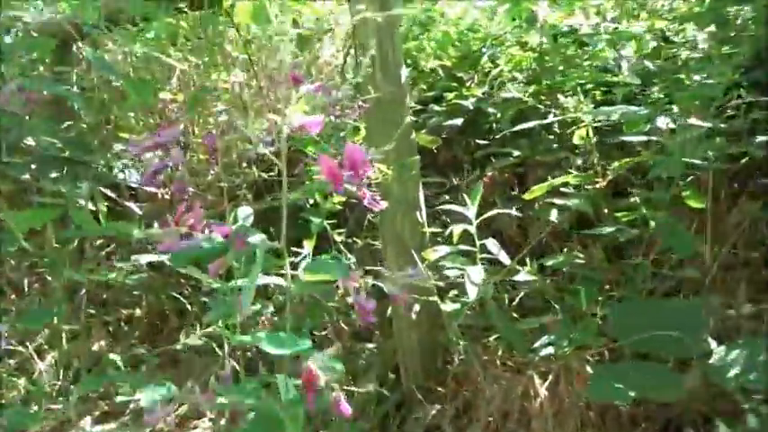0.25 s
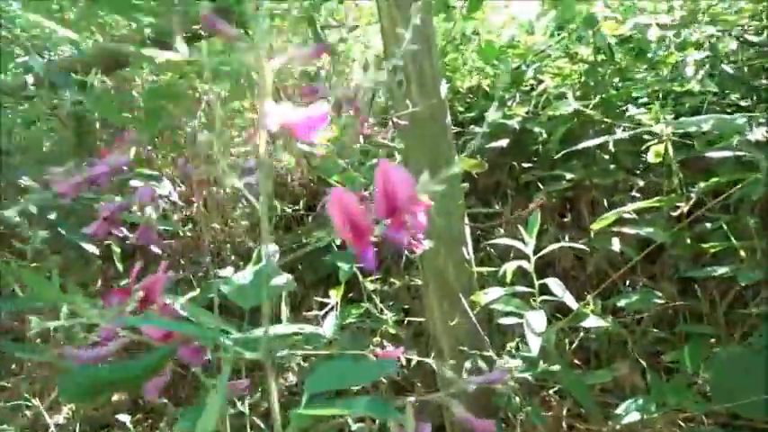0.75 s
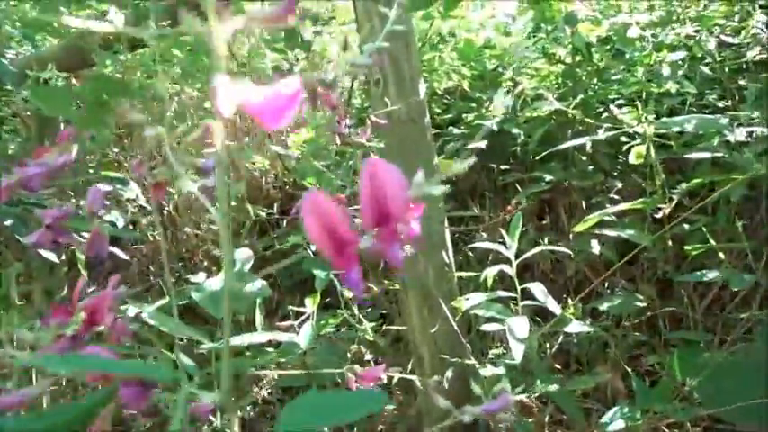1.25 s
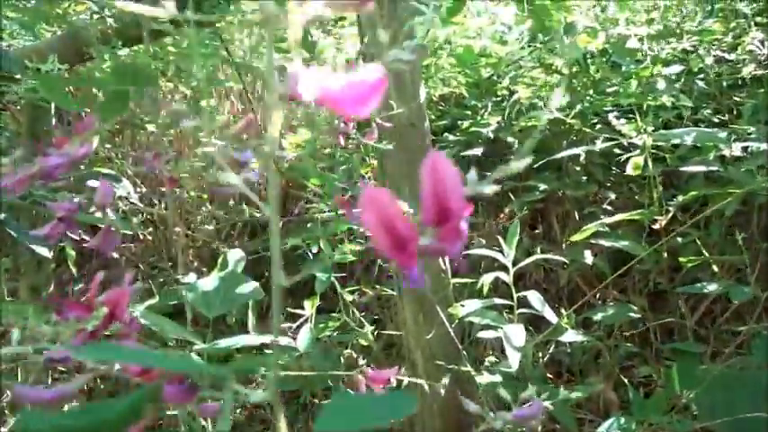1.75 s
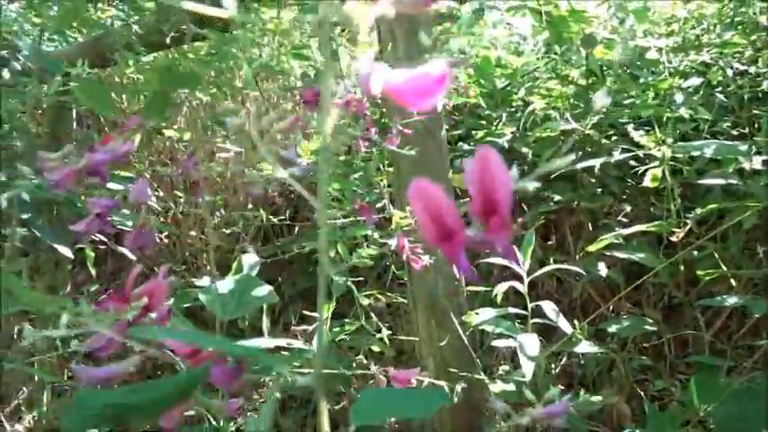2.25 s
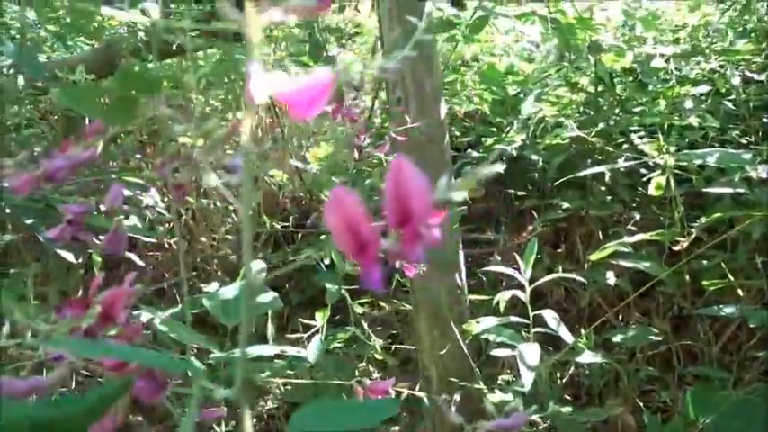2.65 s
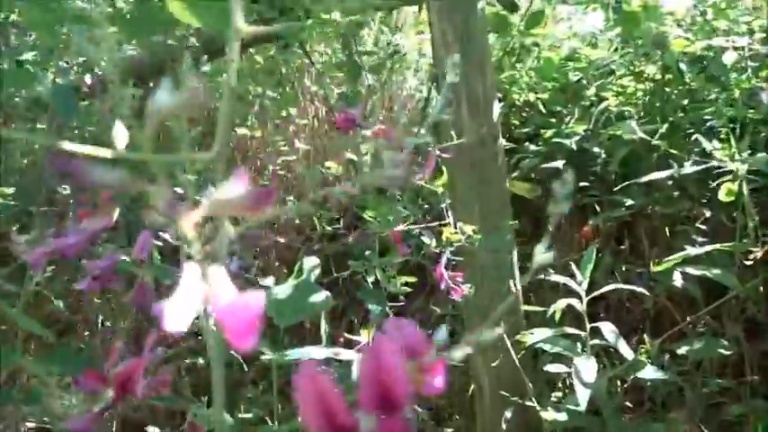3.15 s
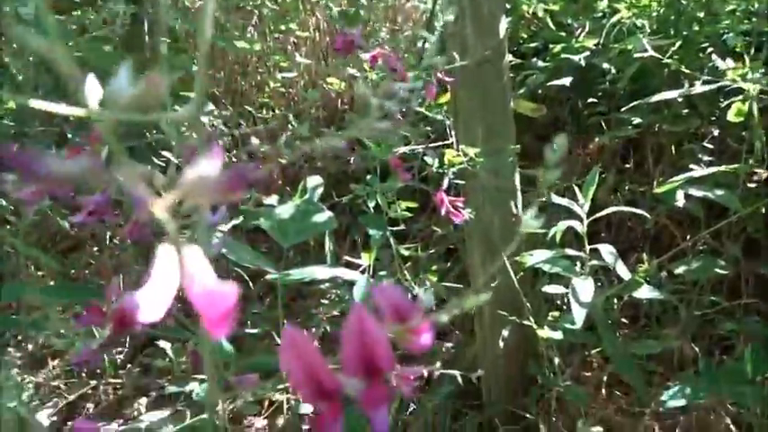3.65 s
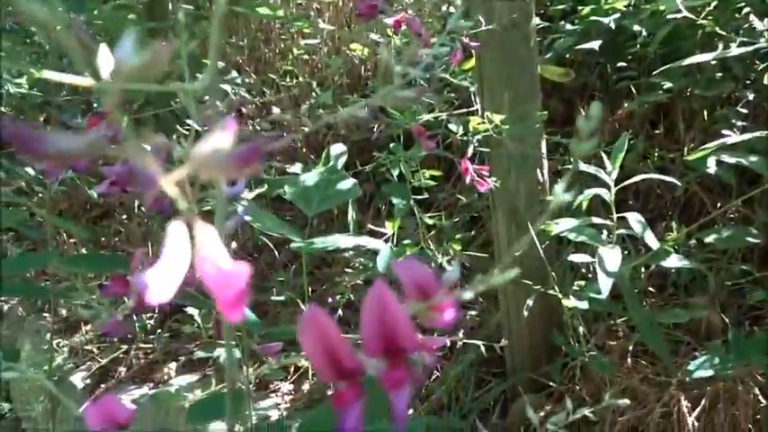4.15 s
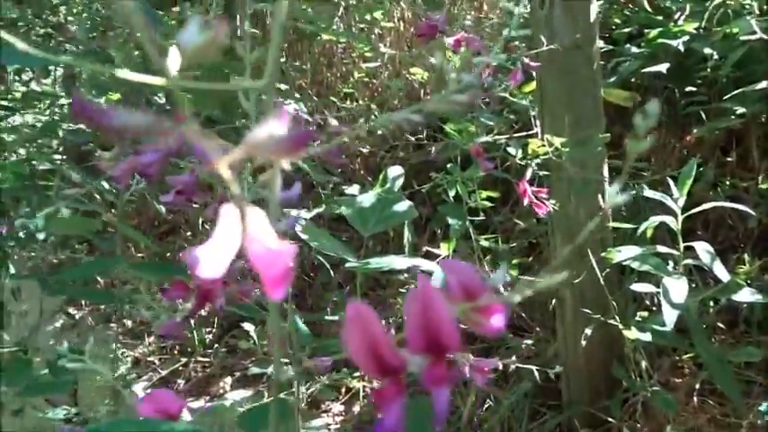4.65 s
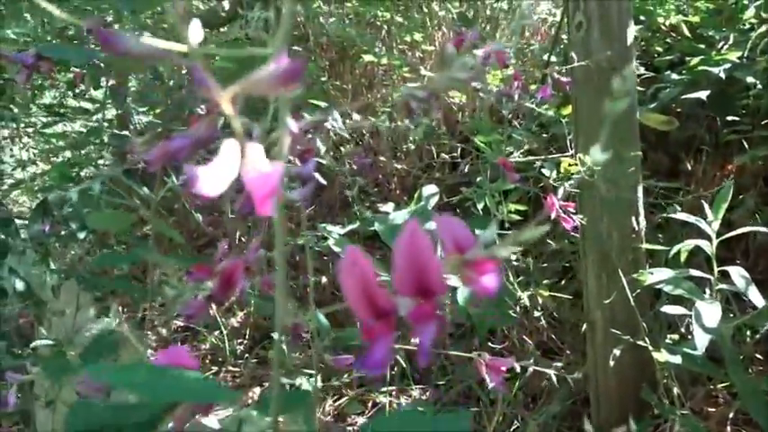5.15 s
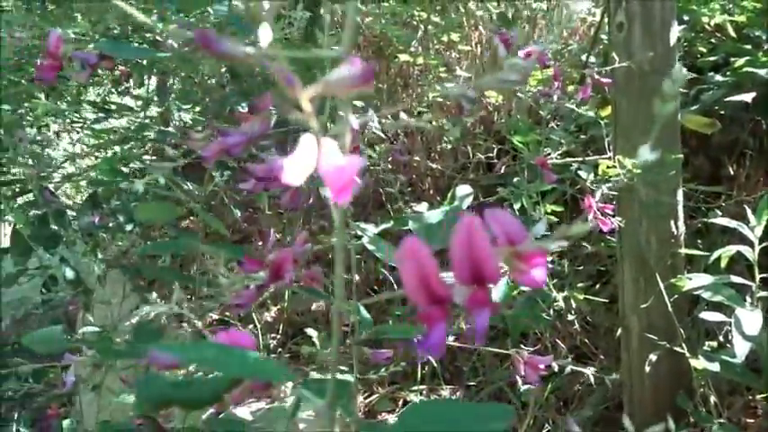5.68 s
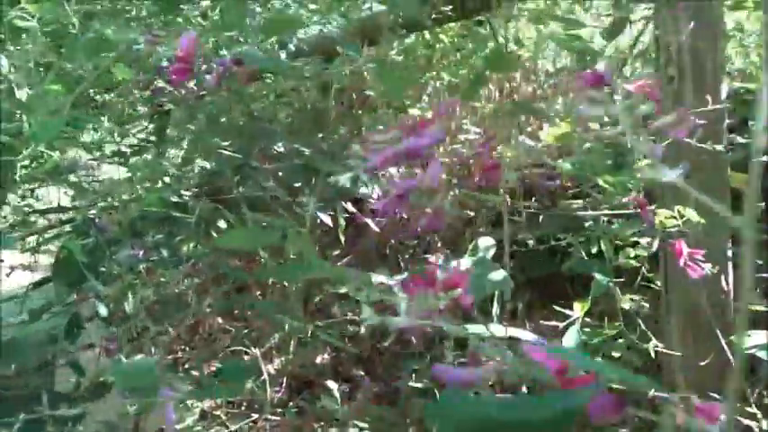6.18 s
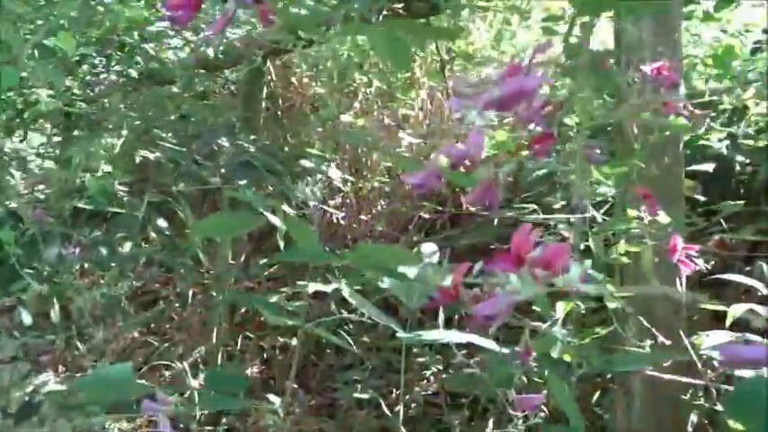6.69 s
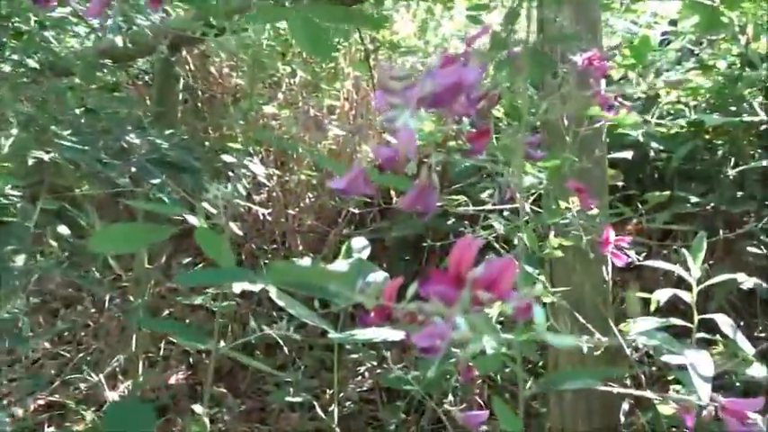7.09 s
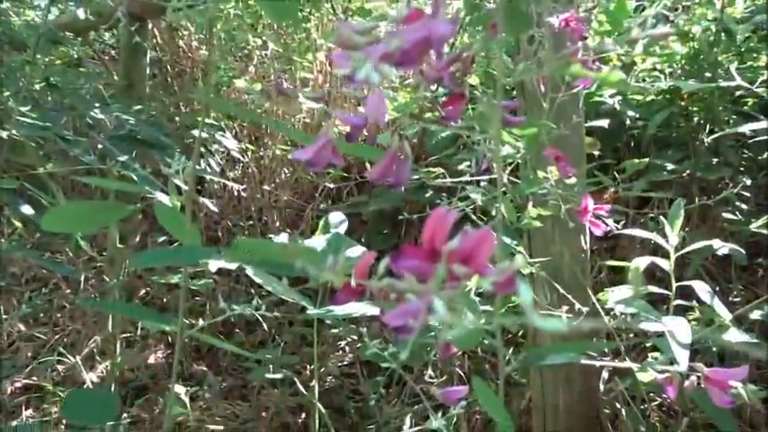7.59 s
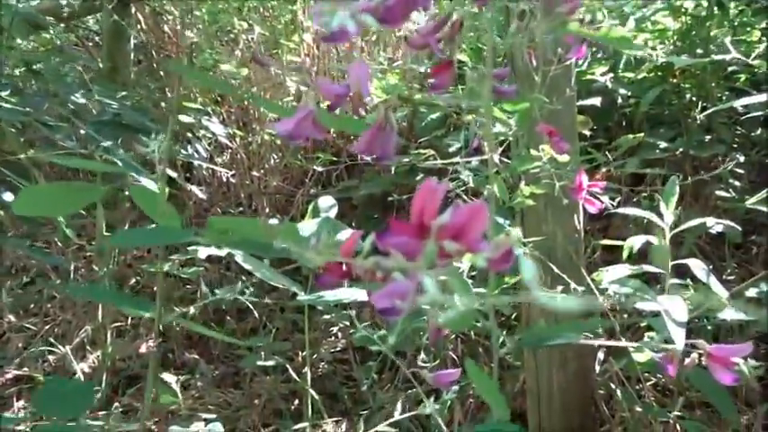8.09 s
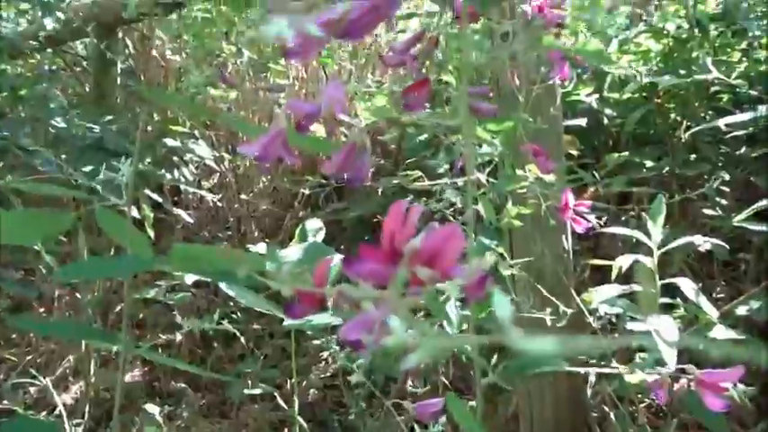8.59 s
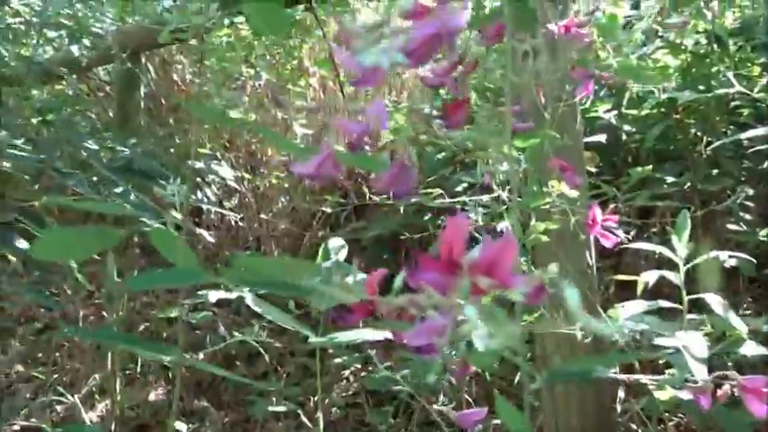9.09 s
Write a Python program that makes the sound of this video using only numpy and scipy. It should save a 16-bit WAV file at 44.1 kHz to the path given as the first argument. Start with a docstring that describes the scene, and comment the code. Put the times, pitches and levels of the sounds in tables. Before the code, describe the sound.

A dense chorus of cicadas buzzes continuously in a summer wood. A few closer ones take turns, each alternating a shrill, throbbing drone with a thinner, higher sizzle in short repeated phrases. A faint distant rush lies underneath. Fingers lightly tap the body of the handheld microphone now and then, mostly early on, with a quick cluster of clicks near the end as the insects carry on.

```python
"""A summer wood full of cicadas. A few near ones alternate a low droning note with a high sizzling one:
their tymbals click at a steady rate that sinks as a phrase ends, and the abdomen lifts and drops to move
the song between two resonances. The rest blur into a rough chorus over a distant rush, rumble and hum.
Fingers tap the shell of a handheld camera, whose two microphone ports hear the wood differently."""
import sys
import numpy as np
from scipy import signal
from scipy.fft import rfft, irfft, next_fast_len
from scipy.io import wavfile
from scipy.ndimage import uniform_filter1d, map_coordinates

SR = 44100
rng = np.random.default_rng(int(sys.argv[2]) if len(sys.argv) > 2 else 0)


def bounce(signal):
    """Save signal as a 16-bit WAV file at the path given by the first command-line argument."""
    frames = np.transpose(np.atleast_2d(signal))
    limited = np.clip(frames, -1, 1)
    pcm = np.round(limited * 32767).astype(np.int16)
    wavfile.write(sys.argv[1], SR, pcm)


N = 411453
TIME_S = np.arange(N) / SR


def amp(db):
    """dB to gain."""
    return 10 ** (np.asarray(db) / 20)


def unit_rms(x):
    """Scale to rms 1."""
    return x / np.sqrt(np.mean(x ** 2) + 1e-20)


def at_hz(rows, hz):
    """Interpolate (Hz, value) rows on a log frequency axis."""
    row_hz, values = np.transpose(rows)
    return np.interp(np.log(hz + 1), np.log(row_hz + 1), values)


def at_time(rows, t):
    """Interpolate each column after the first at times t."""
    row_s, *columns = np.transpose(rows)
    return [np.interp(t, row_s, column) for column in columns]


def filtered(x, response):
    """Apply a frequency response by FFT."""
    size = next_fast_len(N + 8192)
    return irfft(rfft(x, size) * response(np.fft.rfftfreq(size, 1 / SR)), size)[..., :N]


def coloured(white, spectrum):
    """Shape white noise to a spectrum at constant power."""
    power = np.mean(amp(at_hz(spectrum, np.linspace(0, SR / 2, 4000))) ** 2)
    return filtered(white, lambda hz: amp(at_hz(spectrum, hz)) / np.sqrt(power))


def patchy_noise(patchy_db):
    """Two independent noises whose gain wanders in patches of time and frequency."""
    bins = signal.stft(rng.standard_normal((2, N)), nperseg=512)[2]
    patches = uniform_filter1d(rng.standard_normal(bins.shape[1:]), size=5, axis=0)
    patches = unit_rms(uniform_filter1d(patches, size=10, axis=1))
    return unit_rms(signal.istft(bins * amp(patchy_db * patches), nperseg=512)[1][:, :N])


# Each row: time in seconds, level in dB.
RUSH_LEVEL_DB = [(0, -36.5), (.8, -37.5), (2.3, -39), (2.9, -36), (4.9, -38), (5.6, -37), (8.3, -37.5),
                 (9.33, -38.5)]
RUMBLE_LEVEL_DB = [(0, -61), (.3, -60.5), (.8, -76), (3.4, -81), (3.7, -70.5), (7.4, -68), (7.69, -57),
                   (8.1, -68), (8.4, -63), (8.86, -61), (9.33, -66)]
# Each row: frequency in Hz, relative density in dB.
RUSH_SPECTRUM = [(15, -64), (25, -32), (138, -36), (294, -17.5), (325, -22.5), (352, -10.5), (381, -17),
                 (475, -8), (666, -3), (735, 3.5), (1140, -8.5), (1530, -5), (1730, -0.5), (2520, -6),
                 (2900, 2), (3770, -1.5), (6380, -120)]
RUMBLE_SPECTRUM = [(40, -26), (130, -17), (210, -5), (300, 0), (420, -1.5), (600, -27), (900, -90)]


def distant_background(hum_hz=527, hum_start_s=8.3, hum_db=-54.5):
    """A broad rush, a low rumble that swells and fades, and a thin hum near the end."""
    rush = amp(at_time(RUSH_LEVEL_DB, TIME_S)[0]) * coloured(patchy_noise(1.55), RUSH_SPECTRUM)
    rumble = amp(at_time(RUMBLE_LEVEL_DB, TIME_S)[0]) * coloured(patchy_noise(2.5), RUMBLE_SPECTRUM)
    hum = np.sqrt(2) * amp(hum_db) * (TIME_S > hum_start_s) * np.sin(2 * np.pi * hum_hz * TIME_S)
    return rush + rumble + hum * [[1], [0]]


# Each row: time in seconds, then deep drone, bright drone and sizzle levels in dB.
CHORUS_LEVELS_DB = [(0, -36, -31.5, -42), (.4, -35, -29, -44), (.75, -32.5, -33, -38),
                    (1.0, -34, -29.5, -41), (1.2, -40, -24.5, -41), (1.7, -38, -25, -45),
                    (1.95, -33, -26, -43), (2.5, -39.5, -26.5, -46), (2.85, -32.5, -28, -45.5),
                    (3.3, -36.5, -31, -44), (3.62, -34, -34.5, -41), (3.85, -38.5, -30.5, -45),
                    (4.1, -36, -33.5, -43), (4.28, -37.5, -28, -40), (4.6, -31.5, -32, -46),
                    (4.85, -36.5, -25.5, -43), (5.2, -35, -33.5, -44), (5.5, -34.5, -30.5, -42),
                    (6.3, -36, -31.5, -46), (7.0, -35.5, -34, -41), (7.42, -34.5, -30.5, -39),
                    (7.55, -40, -24.5, -46), (8.1, -46, -23, -53), (8.35, -35, -26, -44),
                    (8.9, -36.5, -27.5, -49), (9.33, -38, -32, -49)]
# Each row: frequency in Hz, relative density in dB. Near cicadas share the sizzle spectrum.
DEEP_DRONE_SPECTRUM = [(1800, -59), (2600, -23), (3000, -7), (3500, 1.5), (3900, -4.5), (4500, -26),
                       (5600, -16), (7400, -13), (8500, -28), (10000, -54), (14000, -90)]
BRIGHT_DRONE_SPECTRUM = [(1470, -72), (2500, -20), (2600, -33.5), (3420, -5.5), (3750, -3.5), (4240, 2.5),
                         (4930, -6), (5700, -17), (6620, -16), (7440, -20), (8700, -46), (10000, -31),
                         (13000, -42), (22000, -120)]
SIZZLE_SPECTRUM = [(5290, -39), (9000, -27.5), (9670, -22), (10800, -6), (12800, 1.5), (14900, -1),
                   (16000, -3.5)]


def chorus(near_rasp_power, sway_db=0.5, sway_per_s=7):
    """Many unsteady tymbals overlap into fluttering noise; the rasp of near notes joins its sizzle."""
    deep, bright, far_sizzle = amp(at_time(CHORUS_LEVELS_DB, TIME_S))
    sizzle = np.sqrt(far_sizzle ** 2 + near_rasp_power)
    bands = (deep, DEEP_DRONE_SPECTRUM), (bright, BRIGHT_DRONE_SPECTRUM), (sizzle, SIZZLE_SPECTRUM)
    out = np.zeros((2, N))
    for gain, spectrum in bands:
        sway = map_coordinates(rng.standard_normal(400), [TIME_S * sway_per_s])  # singers join and leave
        flutter_db = 0.38 * unit_rms(uniform_filter1d(rng.standard_normal(N), size=120))
        noise = unit_rms(amp(flutter_db) * patchy_noise(1.2))
        out += coloured(gain * amp(sway_db * sway) * noise, spectrum)
    return out


# Each row: start in seconds, level in dB, knock in Hz, crack re knock in dB, left minus right in dB.
FINGER_TAPS = [(0.15, -17.5, 970, -4, -2), (0.166, -19, 905, -20, -4.0), (0.86, -27, 1970, -2, -9),
               (1.439, -24.5, 784, -9, -1.5), (1.7, -25.5, 850, -8, -1.0), (2.514, -26, 1760, -11, -6),
               (3.527, -29.5, 1490, 0, -6), (4.679, -35, 1870, 3, -8), (5.951, -27, 1390, -4, -14),
               (8.262, -24, 907, -2, 7), (8.269, -24, 930, 2, 2.5), (8.276, -24.5, 820, 3.5, 10),
               (8.282, -26, 1140, -2, 13), (8.286, -30, 1550, 8, 4), (8.289, -20, 780, 1.5, 12),
               (8.401, -28, 754, 3.5, 2)]
# Each row: frequency in Hz, relative density in dB.
CRACK_SPECTRUM = [(400, 7.5), (2200, -0.5), (5000, 2.5), (7500, -7.5), (9000, -11.5), (11000, -8),
                  (16000, -1)]


def finger_taps(low_cut_hz=350, knock_t60_s=0.015, suboctave_t60_s=0.023, crack_t60_s=0.031):
    """A finger on the plastic shell: a dull knock and a crack. The light shell passes no bass."""
    knocks, cracks = np.zeros((2, N)), np.zeros((2, N))
    t = np.arange(SR // 20) / SR
    for start_s, db, hz, crack_db, pan_db in FINGER_TAPS:
        span = np.s_[:, round(start_s * SR):round(start_s * SR) + len(t)]
        gain = amp(db + 1) * amp([[pan_db / 2], [-pan_db / 2]])
        knock = amp(-60 * t / knock_t60_s) * np.sin(2 * np.pi * hz * t)
        suboctave = 0.31 * amp(-60 * t / suboctave_t60_s) * np.sin(np.pi * hz * t)
        knocks[span] += gain * (knock + suboctave)
        cracks[span] += gain * amp(crack_db - 60 * t / crack_t60_s) * rng.standard_normal((2, len(t)))
    taps = knocks + coloured(cracks, CRACK_SPECTRUM)
    return filtered(taps, lambda hz: (1j * hz / (low_cut_hz + 1j * hz)) ** 4)


# One list per singing spell of a near cicada; the first and fifth lists are the same cicada singing again
# later. Each row: time in seconds, tymbal rate in Hz.
TYMBAL_RATES_HZ = [
    [(0, 212.8), (.4, 211.6), (.72, 210.7), (.88, 208.1), (1.12, 204.4), (1.28, 198.9), (1.44, 198.5)],
    [(0, 161.6), (.22, 161.5), (.56, 157.6), (.72, 159.5), (1.28, 154.9), (1.44, 154.4), (2.0, 147.7),
     (2.16, 146.5), (2.44, 139.7), (2.72, 136.3)],
    [(2.42, 174.1), (2.72, 174.2), (3.1, 175.2), (3.8, 175.8), (4.08, 177.3), (4.5, 176.7), (5.3, 177.6),
     (5.84, 177.5), (6.0, 178.1), (6.48, 177.3), (6.72, 178.3), (7.2, 176.8), (7.68, 177.5)],
    [(3.66, 195.4), (3.84, 198.5), (4.0, 199.5), (4.24, 200.2), (4.4, 198.7), (4.72, 196.9)],
    [(4.16, 199.6), (4.32, 201.3), (4.64, 208.4), (4.92, 214.2), (5.12, 214.4), (5.84, 212.9),
     (6.08, 212.1), (6.64, 208.6), (6.88, 205.7), (6.96, 205.7), (7.1, 202.3), (7.34, 202.1), (7.44, 200.6)],
    [(8.32, 209.0), (8.64, 208.1), (8.8, 208.2), (8.9, 209.5), (9.04, 210.3), (9.2, 210.3), (9.28, 209.6)],
]


def tymbals(songs, line_db, shapes_per_s, drift_rad, scatter_db, apart_rad, jitter_cycles, fade_s):
    """Each tymbal cycle repeats nearly the same click-and-echo shape, so a note is a comb of lines."""
    out = np.zeros((2, N))
    harmonics, cycle_size = np.arange(100), 1024
    for rates, song in zip(TYMBAL_RATES_HZ, songs):
        for note in song:
            on_s, off_s = note[0][0], note[-1][0]
            start_s, stop_s = max(on_s - fade_s, 0), min(off_s + fade_s, N / SR)
            samples = np.arange(int(start_s * SR), int(stop_s * SR))
            t = samples / SR
            fade = np.clip(np.minimum(t - on_s, off_s - t) / fade_s + 1, 0, 1)
            envelope = amp(at_time(note, t)[0]) * fade
            # Posture and leaves slowly turn and weigh the lines; each port gets different echoes.
            shape_s = start_s + np.arange(int((stop_s - start_s) * shapes_per_s) + 2) / shapes_per_s
            draws = rng.standard_normal((5, 45, len(harmonics)))[:, :len(shape_s)]
            turn, echoes, scatter = draws[0], draws[1:3], draws[3:]
            angle = 10 * turn[0] + drift_rad * np.cumsum(turn, axis=0)
            angle = angle + apart_rad * echoes[:, :1] + drift_rad * echoes
            line_hz = harmonics * at_time(rates, shape_s)[0][:, None]
            weights = amp(line_db(harmonics, line_hz, note, shape_s) + scatter_db * scatter)
            shapes = irfft(weights * np.exp(1j * angle), cycle_size)
            shapes /= shapes.std(axis=2, keepdims=True)
            shapes = np.concatenate([shapes, shapes[..., :1]], axis=2)  # close the cycle
            muscle_jitter = unit_rms(uniform_filter1d(rng.standard_normal(len(t)), size=400))
            phase = (np.cumsum(at_time(rates, t)[0]) / SR + jitter_cycles * muscle_jitter) % 1
            position = [(t - start_s) * shapes_per_s, phase * cycle_size]
            for port, wavetable in zip(out, shapes):
                port[samples] += envelope * map_coordinates(wavetable, position, order=1)
    return out


def sizzle_note(start_s, length_s, db, attack_s=0.1, release_s=0.09):
    """Attack, hold and release of the clean part, as (seconds, dB) rows."""
    knots_s = np.array([0, min(attack_s, length_s / 2), max(length_s - release_s, length_s / 2), length_s])
    return np.transpose([start_s + knots_s, db + np.array([-7, 0, 0, -8.5])])


# One list per singing spell of a near cicada; the first and fifth lists are the same cicada singing again
# later. Each row: start in seconds, length in seconds, clean level in dB, rasp in dB.
SIZZLE_NOTES = [
    [(0, 0.082, -34, -32), (.32, 0.28, -34, -33.5), (.86, 0.22, -30.5, -42), (1.24, 0.2, -41, -48)],
    [(0, 0.54, -33, -40), (.76, .48, -35.5, -33.5), (1.44, .49, -40.5, -34.5), (2.2, .45, -42, -35.5),
     (2.92, .48, -47.5, -40.5), (3.48, .14, -55, -42)],
    [(7.5, 0.18, -40, -46)],
    [(3.72, .5, -41.5, -44), (4.4, 0.34, -40.5, -42)],
    [(4.98, .46, -30, -41), (5.58, .37, -31.5, -40), (6.08, .37, -29.5, -38), (6.62, 0.35, -30.5, -34),
     (7.14, 0.3, -30.5, -39)],
    [(8.32, .48, -42, -53), (8.95, .38, -43, -46)],
]


def near_sizzle():
    """Tymbal lines under the steady high resonance."""
    songs = [[sizzle_note(*row[:3]) for row in song] for song in SIZZLE_NOTES]
    return tymbals(songs, lambda harmonics, hz, note, t: at_hz(SIZZLE_SPECTRUM, hz), shapes_per_s=10,
                   drift_rad=0.25, scatter_db=3.5, apart_rad=1.3, jitter_cycles=0.0004, fade_s=0.03)


def rasp_power(rise_s=0.066, fall_db_per_s=150, break_s=0.12, break_db=-2):
    """Noisy part of the sizzle: steady, then growing as each note loses step at its end."""
    power = np.zeros(N)
    for song in SIZZLE_NOTES:
        for start_s, length_s, clean_db, rasp_db in song:
            left_s = start_s + length_s - TIME_S
            rise = np.clip((TIME_S - start_s) / rise_s, 0, 1) if start_s > 0 else 1
            fall = amp(fall_db_per_s * np.minimum(left_s, 0))
            breakup = np.clip(1 - left_s / break_s, 0, 1) * amp(clean_db + break_db) ** 2
            power += (rise * fall) ** 2 * (amp(rasp_db) ** 2 + breakup)
    return power


def drone_note(start_s, length_s, db, first_hz, lifted_hz, attack_s=0.058, release_s=0.08):
    """Attack, hold and release while the resonance glides and settles, as (seconds, dB, Hz) rows."""
    lift_s = min(max(0.33 * length_s, 0.047), length_s)
    hold_s = [min(attack_s, length_s / 2), max(length_s - release_s, length_s / 2)]
    knots_s = np.sort([0, lift_s, *hold_s, length_s])
    attack_db = -4.5 * (1 - knots_s / attack_s)
    release_db = -6 * (1 - (length_s - knots_s) / release_s)
    level_db = db + np.minimum(np.minimum(attack_db, release_db), 0)
    resonance_hz = np.interp(knots_s, [0, lift_s], [first_hz, lifted_hz])
    return np.transpose([start_s + knots_s, level_db, resonance_hz])


# Each row: frequency over resonance frequency, gain in dB.
ABDOMEN_RESPONSE = [(.6, -45), (.66, -28), (.78, -11), (.88, -4), (.97, 0), (1.1, 0), (1.17, -10),
                    (1.26, -23), (1.46, -15), (1.6, -24), (1.8, -38), (2.1, -70)]
# The two tymbals alternate, so even lines lead. Each row: harmonic number, gain in dB.
HARMONIC_GAINS_DB = [(17, -3), (18, 1), (19, -6), (20, 5), (21, -7), (22, 4), (23, 0), (24, 2), (25, -1),
                     (26, -3), (28, 0)]
# One list per singing spell of a near cicada; the first and fifth lists are the same cicada singing again
# later. Each row: start in seconds, length in seconds, level in dB, resonance in Hz at first and once lifted.
DRONE_NOTES = [
    [(.12, .24, -25.5, 4280, 4430), (.64, 0.23, -22.5, 4080, 4220)],
    [(.515, 0.063, -21, 3200, 4330), (.59, .22, -23, 4650, 4400), (1.24, 0.28, -24.5, 4000, 4210),
     (1.96, 0.32, -25.5, 3820, 4050)],
    [(2.42, 0.34, -29.5, 3860, 3920), (3.06, .3, -28, 3660, 3850), (3.72, .34, -28, 3460, 3930),
     (4.42, 0.16, -26.5, 3970, 4300), (5.12, 0.26, -27.5, 3550, 4170), (5.8, 0.13, -27.5, 4030, 4260),
     (6.44, 0.36, -27, 3780, 4450), (7.16, .28, -25.5, 4200, 4240)],
    [(3.621, 0.16, -28.5, 3920, 4200)],
    [(4.2, 0.85, -25, 4100, 4790), (5.42, .26, -25.5, 4170, 4315), (5.9, .24, -24.5, 4140, 4300),
     (6.5, .2, -25, 4500, 4730), (6.97, .23, -23, 4120, 4500)],
    [(8.84, .14, -28, 4350, 4230)],
]


def near_drone():
    """Throbbing tymbal lines under the moving resonance of the abdomen."""
    def line_db(harmonics, hz, note, t):
        resonance_hz = at_time(note, t)[1][:, None]
        return at_hz(ABDOMEN_RESPONSE, hz / resonance_hz) + at_hz(HARMONIC_GAINS_DB, harmonics)

    songs = [[drone_note(*row) for row in song] for song in DRONE_NOTES]
    return tymbals(songs, line_db, shapes_per_s=40,
                   drift_rad=0.6, scatter_db=4.5, apart_rad=0.8, jitter_cycles=0.001, fade_s=0.025)


# Each row: frequency in Hz, left-right coherence from 0 to 1.
PORT_COHERENCE = [(40, .3), (250, .88), (800, .8), (2000, .64), (4200, .47), (6500, .22), (13000, .22)]


def diffuse(pair):
    """Mix two independent fields to the coherence of scattered sound at the two ports."""
    def mid_side_gains(hz):
        angle = np.arccos(np.clip(at_hz(PORT_COHERENCE, hz), 0, 1)) / 2
        return np.array([np.cos(angle), np.sin(angle)])

    mid, side = filtered(pair, mid_side_gains)
    return np.array([mid + side, mid - side])


# Each row: frequency in Hz, left minus right in dB.
PORT_BALANCE_DB = [(60, -3), (110, 3), (200, -1), (380, 3), (700, -1.0), (1290, 0), (2380, -5),
                   (4400, -3.0), (8120, 1), (15000, 6.5)]
# Each row: frequency in Hz, phase lead of the left port in radians.
PORT_LEAD_RAD = [(0, 2.5), (340, -0.06), (690, 1.72), (950, 1.27), (2300, 2), (3300, 2.5), (6400, 5),
                 (12000, 16.5), (16000, 18)]


def microphone_ports(pair):
    """Balance and phase of the two ports in the camera body."""
    def response(hz):
        left = amp(at_hz(PORT_BALANCE_DB, hz) / 2) * np.exp(0.5j * at_hz(PORT_LEAD_RAD, hz))
        return np.array([left, 1 / left])

    return filtered(pair, response)


def scene():
    """The wood through the ports, plus taps through the shell."""
    near_cicadas = near_drone() + near_sizzle()
    scattered = diffuse(chorus(rasp_power()) + distant_background())
    return microphone_ports(near_cicadas + scattered) + finger_taps()


def record(dry):
    """The camera passes nothing above its band limit."""
    limit_hz = 15800
    return filtered(dry, lambda hz: hz < limit_hz)


dry = scene()
out = record(dry)
bounce(out)
```